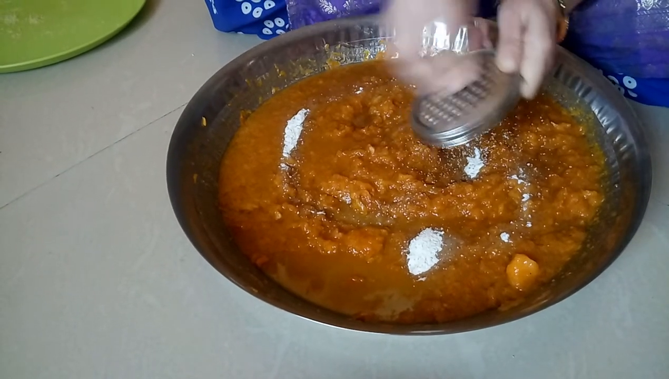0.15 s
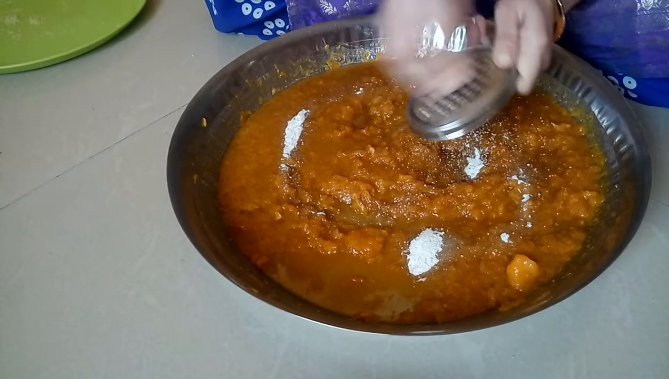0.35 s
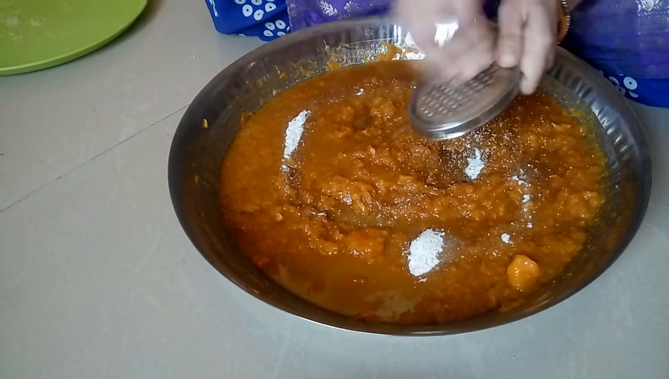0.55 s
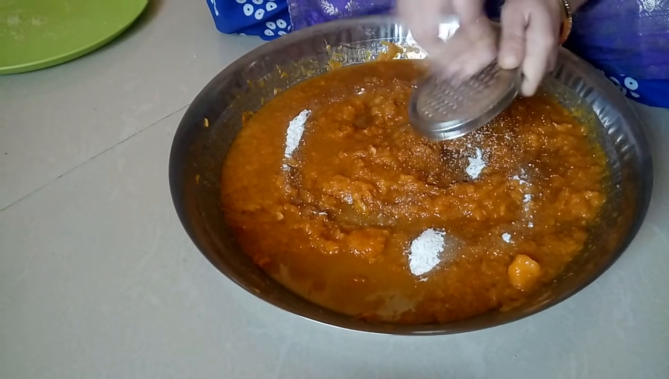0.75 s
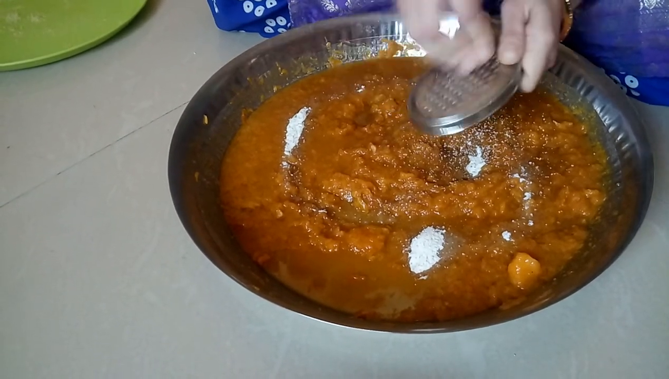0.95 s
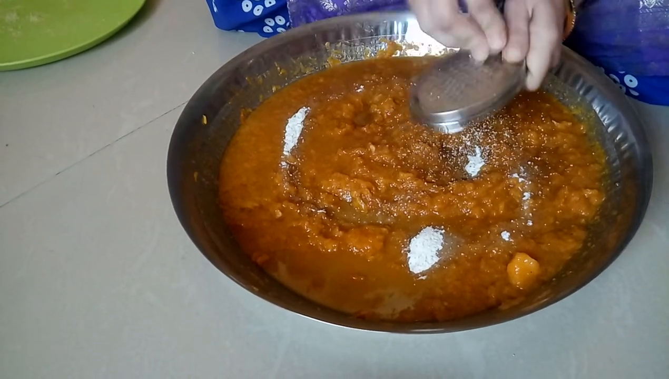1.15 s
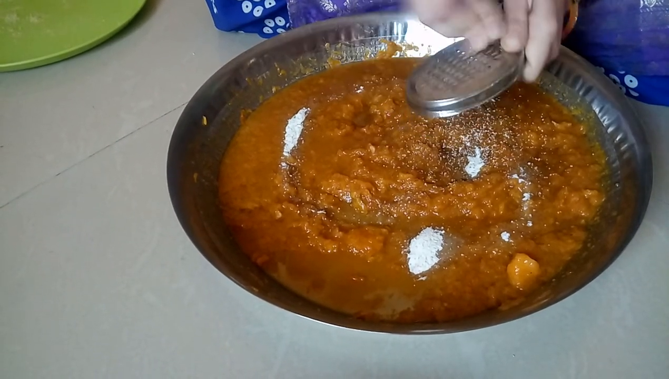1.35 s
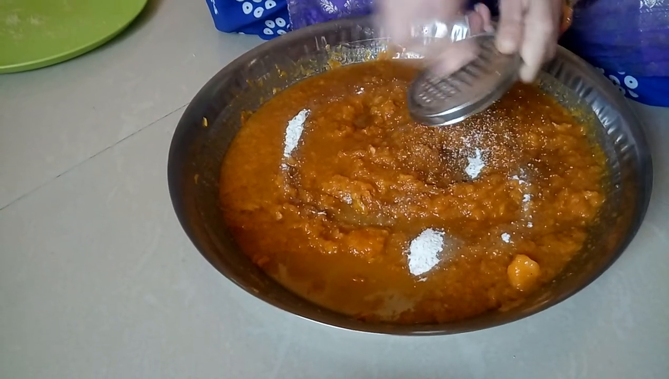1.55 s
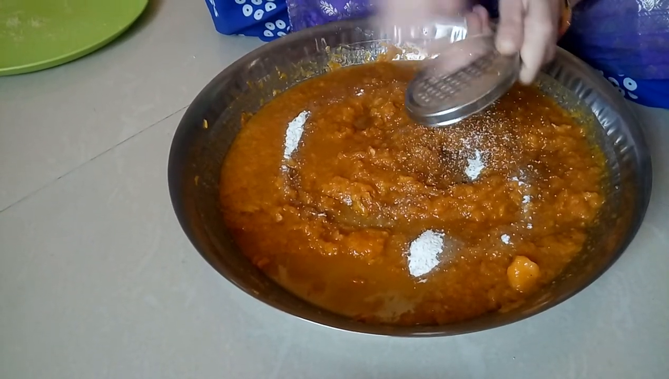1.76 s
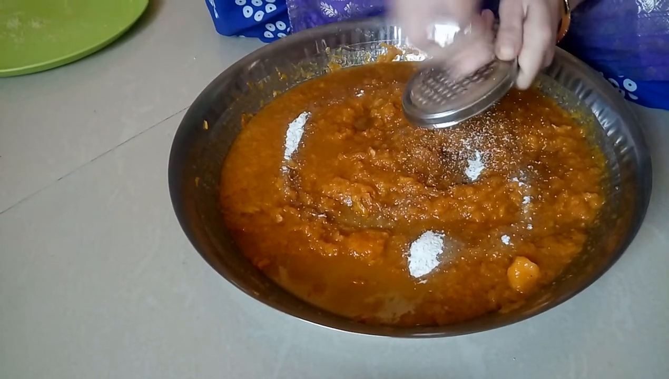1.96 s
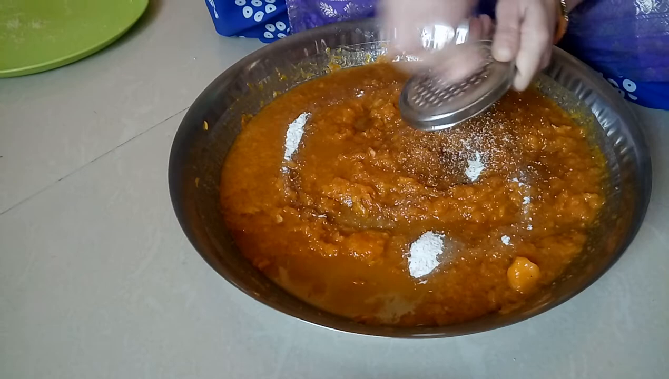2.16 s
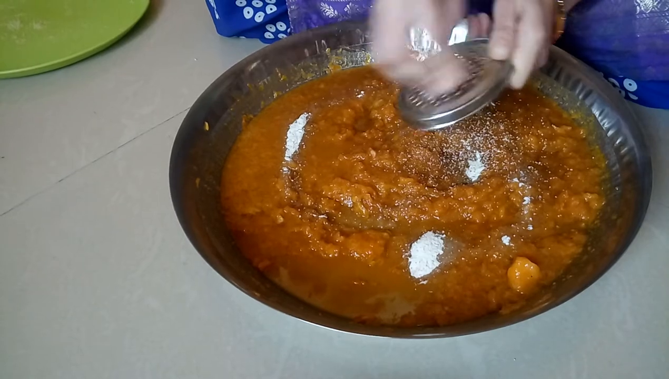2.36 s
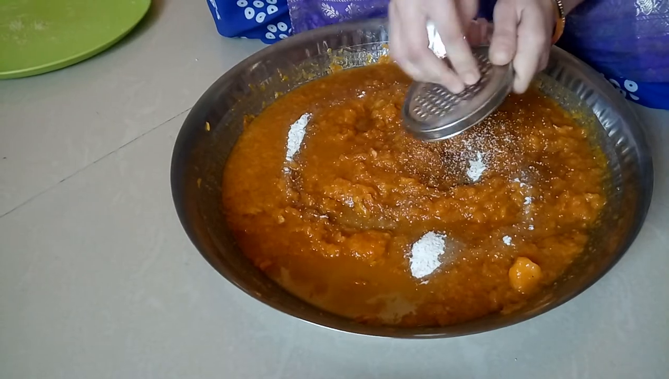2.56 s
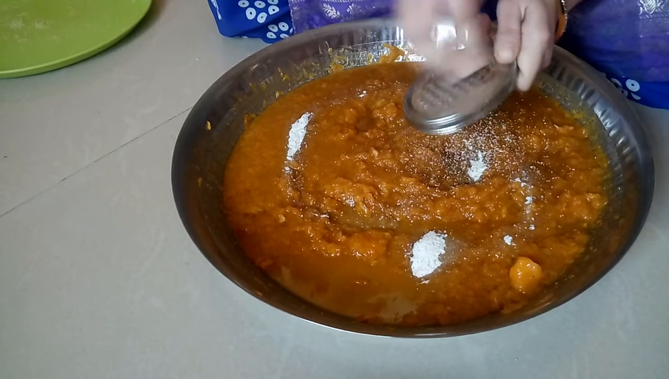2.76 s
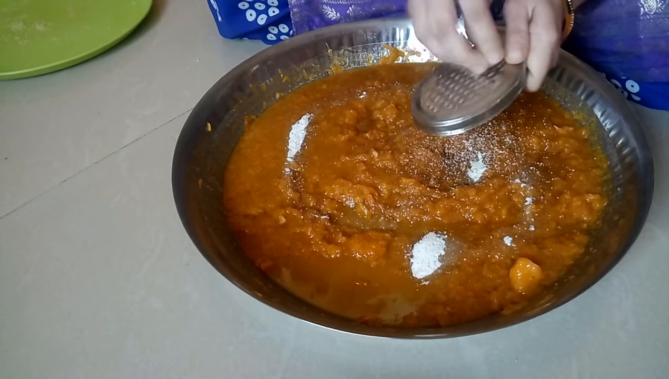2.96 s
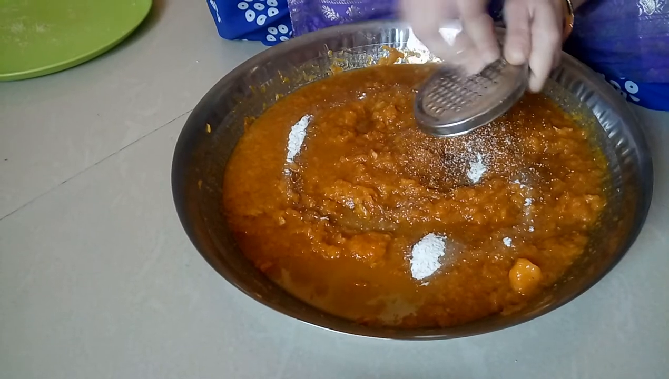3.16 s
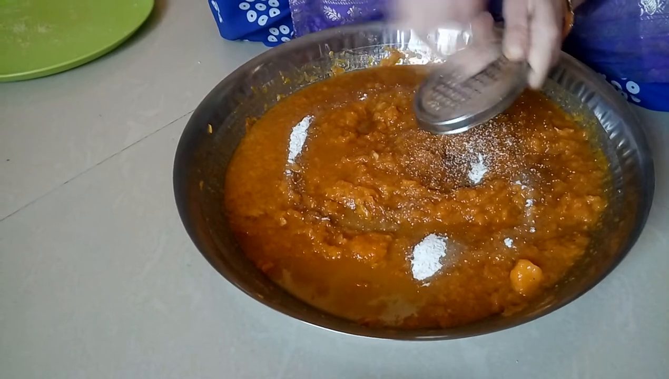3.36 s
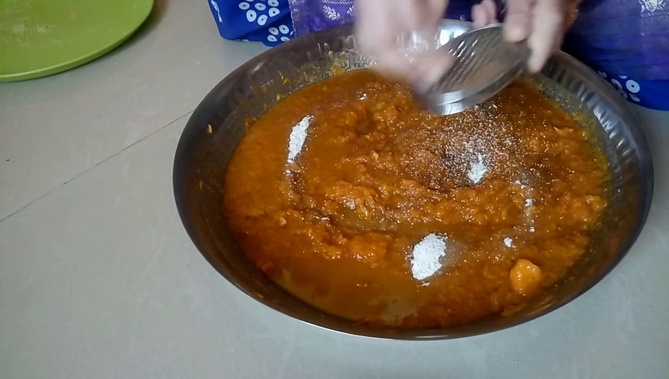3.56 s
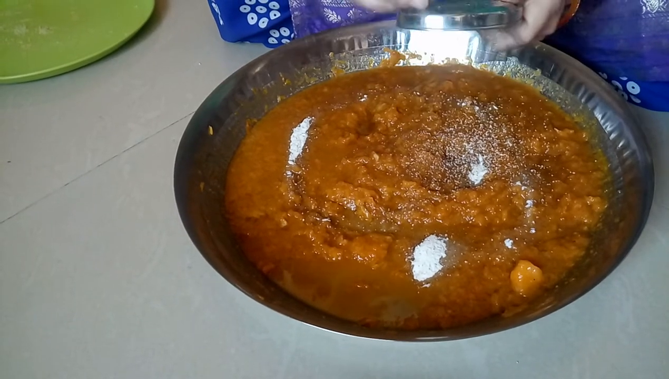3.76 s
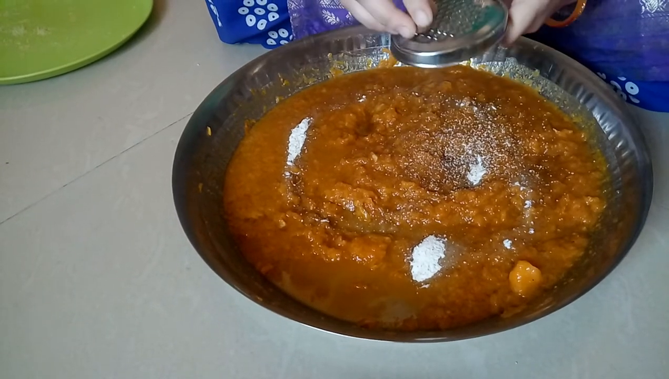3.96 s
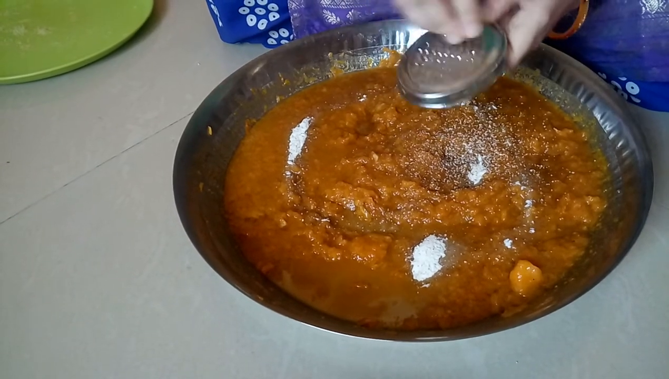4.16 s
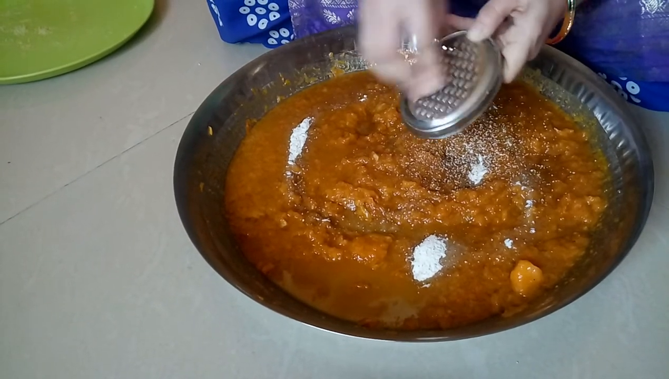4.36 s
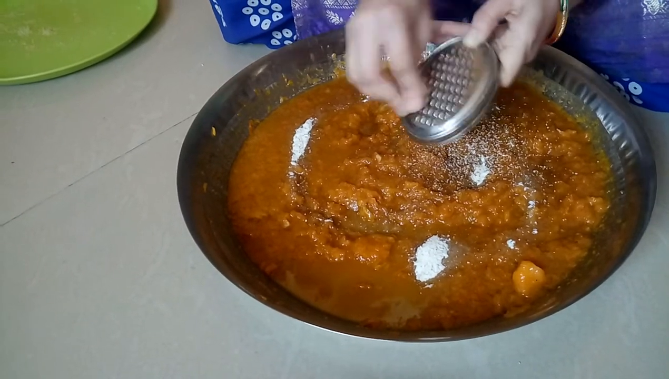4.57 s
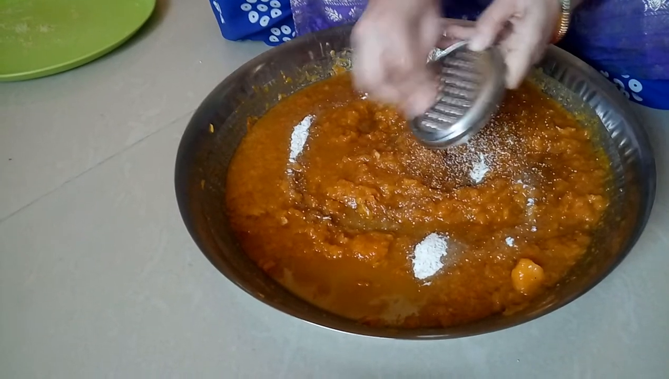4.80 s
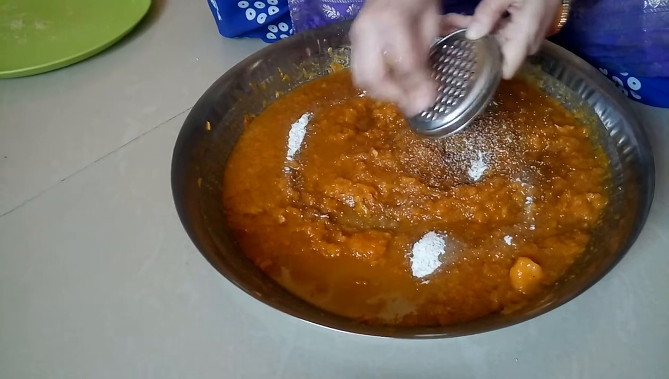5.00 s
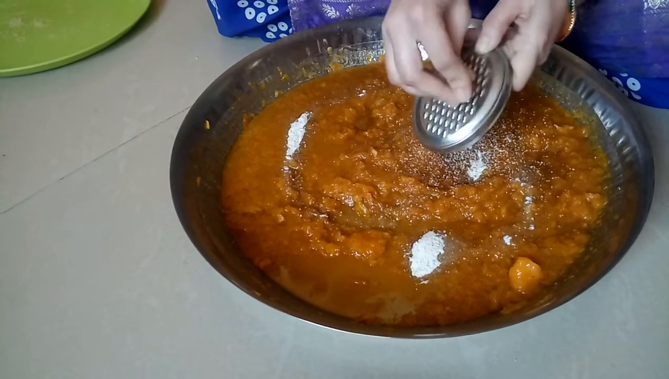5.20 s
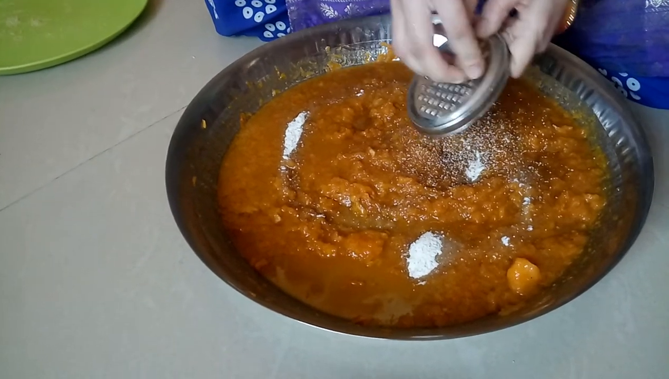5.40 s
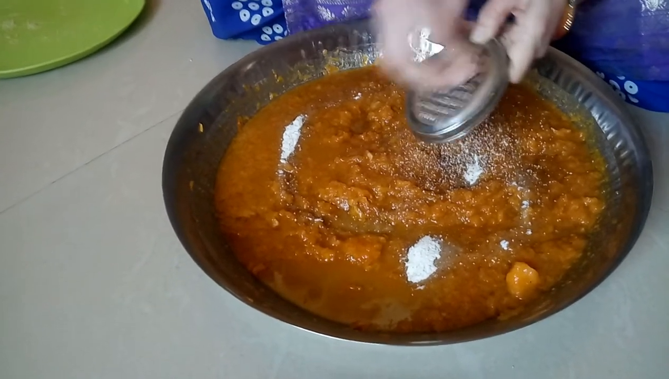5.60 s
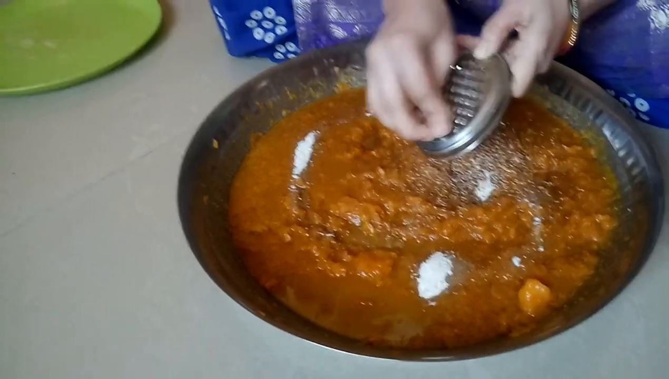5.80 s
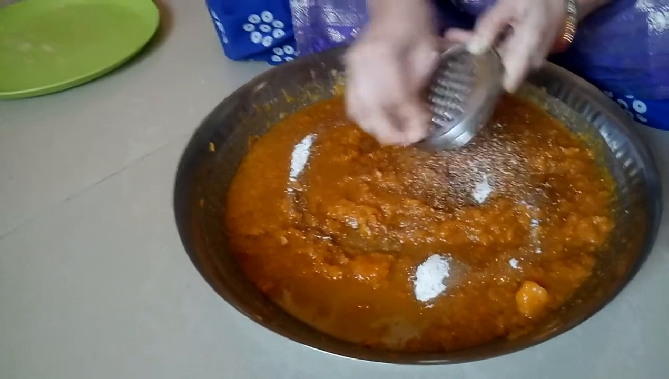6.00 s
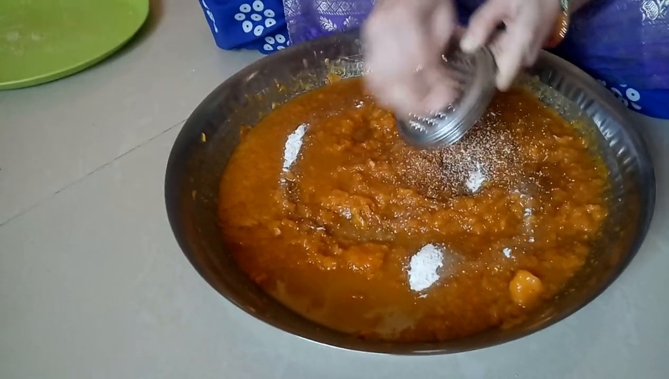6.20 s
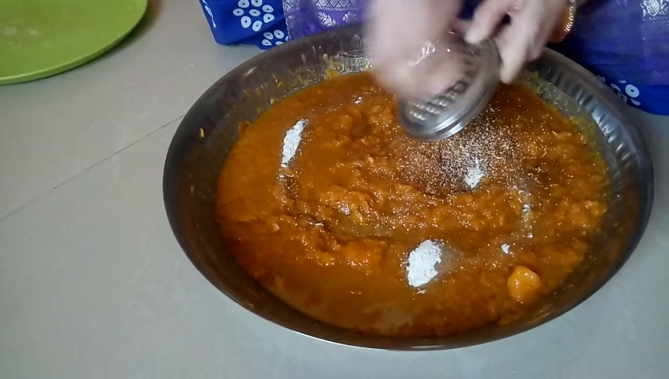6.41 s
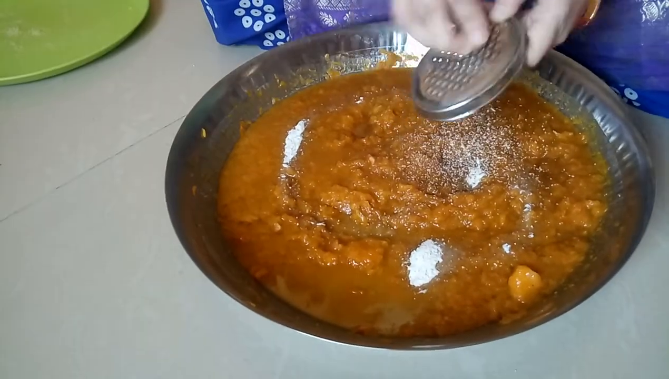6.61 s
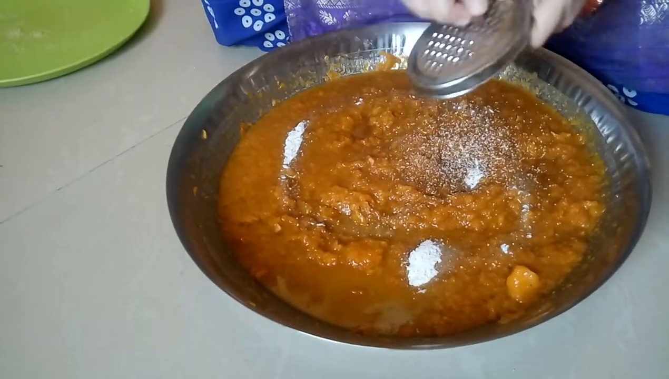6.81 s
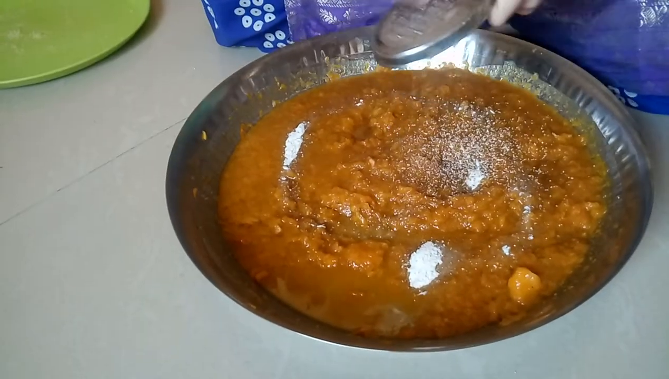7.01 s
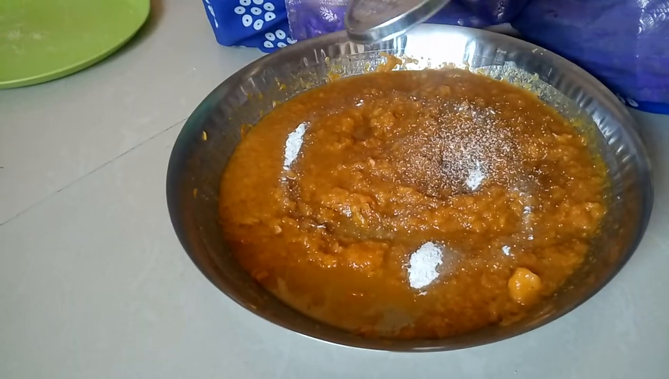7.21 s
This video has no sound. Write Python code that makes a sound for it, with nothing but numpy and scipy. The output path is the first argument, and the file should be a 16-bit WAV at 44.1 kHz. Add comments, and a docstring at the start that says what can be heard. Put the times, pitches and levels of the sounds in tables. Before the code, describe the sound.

Fast, dry, metallic grating strokes of a hard nut on a little steel grater, pausing briefly midway, then resuming more slowly over faint room hush.

```python
"""Nutmeg on a small steel grater

In a kitchen, close to the camera microphone, a nutmeg is rubbed to and fro over a small round grater.
Noisy tooth contacts drive the modes of the held plate; single teeth catch with short ringing scrapes,
and sticking gives brief squawks. Decaying noise makes the room's answer. Hush, rumble and a faint
electric whine lie beneath, and filtered pushes are heard late on as the camera is nudged."""
import sys
import numpy as np
from scipy import signal
from scipy.fft import rfft, irfft, next_fast_len
from scipy.io import wavfile
from scipy.ndimage import uniform_filter1d, map_coordinates

SR = 44100
rng = np.random.default_rng(int(sys.argv[2]) if len(sys.argv) > 2 else 0)


def wav_record(signal):
    """Record a signal, one row per channel, as 16-bit PCM in the file named by sys.argv[1]."""
    frames = np.transpose(np.atleast_2d(signal))
    bounded = np.clip(frames, -1, 1)
    # unit amplitude maps onto the largest positive 16-bit level
    quanta = np.round(bounded * 32767).astype(np.int16)
    wavfile.write(sys.argv[1], SR, quanta)


N = 319725
T = np.arange(N) / SR  # time [s]

# Room and microphone hush: (frequency [Hz], relative density [dB per Hz])
HUSH_SPECTRUM = [(15, -67), (25, -11), (60, -11), (130, -11), (270, -15.5), (800, -14.5), (1800, -23),
                 (3300, -12.5), (4800, -11.5), (6400, -12.5), (8000, -28), (10500, -31), (15500, -48)]
# Thin electric tones: (frequency [Hz], rms level [dB])
WHINE_TONES = [(3456, -70.5), (3515, -79), (4651, -82), (5782, -83), (9243, -90), (9302, -87), (10433, -86),
               (11628, -97), (12758, -92)]
# Steadier sounds under the strokes: (time [s], room rumble [dB], low hum of the rubbed plate [dB])
UNDER_LEVELS = [(0,-70,-51),(.77,-72,-53),(1.41,-66.5,-49.5),(1.7,-71.5,-57.5),(2.36,-68,-68),(2.7,-72,-77),(3.01,-74,-58),(3.35,-74,-55.5),
                (3.74,-68,-65),(4.3,-74.5,-70),(4.97,-73,-50.5),(5.37,-62,-90),(5.57,-73,-66),(5.71,-59.5,-72),(5.96,-58,-59),(6.46,-71.5,-61),(7.25,-73,-67)]
# Strokes of the nut; the cutting stroke bites, the stroke back is duller:
# (start [s], rise [s], fall [s], level [dB], treble bite against that level [dB], favoured main mode [Hz])
NUT_STROKES = [(.007,0.018,0.027,-20.5,-23.5,3330),(.125,0.016,0.023,-20,-39,4100),(.216,0.012,0.037,-20,-23,4960),(0.321,.016,0.026,-22.5,-32,3180),
               (.409,0.019,0.038,-21.5,-23.5,3090),(0.532,0.018,0.029,-21.5,-35,3020),(0.626,0.021,0.029,-21,-25,3100),(0.746,0.013,0.024,-20,-41,4540),
               (.83,0.018,0.035,-19.5,-24.5,3040),(0.939,0.014,0.031,-25.5,-33,4700),(1.037,.019,0.037,-24,-24,4720),(1.146,0.0091,0.048,-24,-38,4500),
               (1.249,0.019,0.041,-21,-26,3280),(1.367,0.014,0.038,-25,-37,4100),(1.467,0.03,0.03,-21.5,-22,4600),(1.587,0.018,0.022,-22,-35,2970),
               (1.674,0.029,0.032,-27.5,-24,3060),(1.792,0.02,0.028,-29,-31,4000),(1.897,0.022,0.032,-22.5,-27,2930),(2.009,0.024,0.031,-29,-30,4350),
               (2.119,0.02,0.039,-21.5,-28,3900),(2.229,0.029,0.03,-31.5,-27,4000),(2.337,0.025,0.037,-23,-27.5,4850),(2.458,0.037,.0087,-29,-35,3960),
               (2.537,0.019,0.032,-35.5,-26,3980),(2.736,.037,0.016,-40.5,-27,4330),(2.817,0.0068,.045,-69,-42,3770),(2.845,0.034,0.035,-23.5,-25.5,2860),
               (2.973,0.024,0.023,-25,-32,3260),(3.077,0.033,0.03,-22.5,-28.5,4300),(3.21,0.013,0.03,-24,-32,4670),(3.307,.025,0.032,-25,-26,4450),
               (3.413,.015,0.033,-24,-39,3050),(3.519,0.025,0.025,-23,-21.5,3200),(3.636,0.0075,0.025,-37.5,-28,4300),(4.162,0.055,0.029,-37,-27,2920),
               (4.317,0.059,0.031,-29.5,-25,3830),(4.448,0.039,0.025,-32,-33,4400),(4.567,0.028,0.026,-25,-26,4100),(4.655,0.037,0.03,-32,-29,4050),
               (4.786,0.023,0.032,-25,-28.5,3440),(4.885,0.046,0.018,-29.5,-34,3900),(4.995,0.03,0.021,-20,-28,3520),(5.088,0.03,0.029,-25,-37,3280),
               (5.174,0.042,.0077,-37,-24,4200),(5.281,0.0037,0.031,-33.5,-36,2860),(5.51,0.042,0.029,-30.5,-24,4420),(5.649,0.041,0.018,-29,-31,4150),
               (5.779,0.035,0.038,-24.5,-25.5,3250),(5.913,0.039,0.019,-30.5,-35,3100),(6.01,0.034,0.034,-27,-28.5,3350),(6.147,0.039,0.018,-32,-28,3000),
               (6.251,0.029,0.034,-25,-26,4020),(6.379,0.034,0.016,-33.5,-26,3940),(6.473,0.029,0.029,-23,-23.5,3060),(6.601,0.029,0.021,-27.5,-28.5,4730),
               (6.698,0.027,0.031,-25.5,-22,4900),(6.827,.0061,0.046,-26,-35,3180),(6.917,0.026,0.029,-25.5,-19.5,3600),(7.039,0.019,0.024,-25.5,-37,4100),
               (7.137,0.013,0.04,-25,-22,4600)]
# Modes of the held plate, in five families from low to high:
# (frequency [Hz], width [Hz], relative level before weighting by width [dB])
HAND_MODES = [(334, 610, -7.5), (546, 1090, -5), (977, 23, 4.5)]
LOW_MODES = [(1396, 170, -40), (1616, 188, -26), (1868, 10, -21), (2246, 142, -16.5), (2526, 180, -14.5)]
MAIN_MODES = [(2859, 140, -4), (3185, 268, 1), (3527, 180, -3), (3929, 240, 2), (4212, 365, 2),
              (4510, 290, 0), (4806, 122, 4), (5058, 434, 2)]
UPPER_MODES = [(5490, 630, -11.5), (5705, 1070, -10.5), (5800, 62, 0), (6305, 420, -7.5), (7200, 83, -14.5),
               (6815, 510, -15), (7530, 220, -20)]
TOP_MODES = [(8680, 300, -70), (9330, 350, -26.5), (11020, 340, -31.5), (11500, 680, -34),
             (13800, 1000, -46.5), (14900, 900, -70)]
# How each family follows a stroke, one row a family:
# (lead-in [s], share at the start [0-1], stretch of the fade [ratio], grip scatter [dB])
FAMILY_FOLLOW = [(0.0084, 0.49, 1.38, 4), (0.03, 0.13, 0.75, 7.5), (0.0087, 0.49, 0.78, 4.5),
                 (0.014, 0.36, 1.64, 4.5), (0.0078, 0.58, 1.02, 7)]
# How the hum follows a stroke: (lead-in [s], share at the start [0-1], stretch of the fade [ratio])
HUM_SWELL = (.02, 0.98, 1.5)
# The shifting grip, for a usual stroke: (time [s], hand modes [dB], low modes [dB])
GRIP_LEVELS = [(0,-57,-46),(.6,-56,-32.5),(1.1,-58,-41),(1.8,-55,-39),(2.15,-50,-33.5),(2.5,-47,-36),(2.8,-57,-35.5),(3.5,-57,-38),
               (4.3,-59.5,-43.5),(5,-60.5,-40.5),(5.3,-43.5,-34),(5.6,-57.5,-44),(6.05,-44.5,-41.5),(6.5,-53,-37.5),(7.25,-60.5,-50)]
# Decay of the room's answer: (frequency [Hz], time to fall 60 dB [s])
KITCHEN_DECAY = [(300, 1), (2600, 0.29), (6000, 0.47), (12000, 0.55)]
# Single catches of a tooth, mostly strong, a few faint:
# (time [s], peak [dB], favoured pitch [Hz], low modes against the rest [dB], rise [ms])
TOOTH_CATCHES = [(0.0147, -17.5, 4480, -16, 1.3), (0.0254, -23, 6270, -16, 1.8),
                 (0.0772, -16, 4700, -12, 0.5), (0.1343, -17, 3980, -13, 1.3),
                 (0.1414, -18, 4050, -10, 1.4), (0.218, -18, 4930, -9, 1.3),
                 (0.2436, -14.5, 4860, -11, 1.2), (0.3276, -18.5, 4800, -12, 1.1),
                 (0.3414, -15.5, 5100, -18, 1.5), (0.418, -18, 5070, -12, 1.7),
                 (0.4424, -15.5, 4700, -17, 1.5), (0.545, -12, 3200, -10, 1.3),
                 (0.5526, -16.5, 4800, -12, 1.3), (0.6275, -12.5, 5140, -15, 1.7),
                 (0.6494, -11, 4420, -13, 1.6), (0.7515, -11, 4430, -15, 1), (0.7597, -9, 4600, -22, 1.1),
                 (0.8404, -8.5, 4980, -21, 1), (0.8474, -7, 5000, -14, 1.7), (0.947, -14, 4280, -24, 1.1),
                 (0.9604, -18, 4740, -12, 1.1), (0.966, -21, 3980, -9, 1.3),
                 (1.0333, -19.5, 5800, -17, 1.3), (1.0455, -15.5, 4950, -9, 1.6),
                 (1.0578, -16, 3230, -17, 2.1), (1.0666, -15, 4750, -4, 1.3), (1.0814, -18, 6140, -13, 1.3),
                 (1.1641, -13, 4700, -12.5, 1.14), (1.173, -14, 4670, -17, 0.93),
                 (1.191, -16, 3830, -16, 1.3), (1.2625, -11.5, 5100, -12, 1.5),
                 (1.2754, -10.5, 4600, -13, 1.4), (1.314, -18.5, 3060, -8, 1.2),
                 (1.3878, -11, 4400, -15, 1), (1.4088, -14.5, 4680, -16, 1.2),
                 (1.4636, -18, 4840, -11, 1.5), (1.4902, -15, 4600, -10, 1.6),
                 (1.5956, -17.5, 3980, -17, 1.5), (1.6083, -14, 4060, -12, 1.5),
                 (1.7046, -14, 4830, -17, 1.3), (1.7898, -19.5, 4350, -14, 1.8),
                 (1.8225, -17, 3900, -12, 1.2), (1.8347, -17, 3930, -15, 1.5), (1.877, -33, 4900, -5, 1.3),
                 (1.8974, -17.5, 4200, -9, 2.3), (1.9454, -20, 4860, -16, 1.6),
                 (2.0376, -17, 4320, -14.5, 1.4), (2.0502, -16, 4570, -19, 1.5),
                 (2.1301, -16, 3880, 0, 1.3), (2.143, -9, 4450, -9, 0.98), (2.1561, -7.5, 4580, -14, 0.55),
                 (2.2523, -18, 4160, -17, 1.3), (2.2657, -19, 3880, -14, 1.3),
                 (2.3338, -20, 4830, -11, 1.1), (2.3501, -19, 4700, -11, 1.3),
                 (2.3635, -16, 4640, -12, 0.98), (2.3768, -13, 4660, -10, 0.91),
                 (2.4672, -15, 3900, -16, 1.5), (2.4872, -12, 3900, -21, 1.7),
                 (2.5486, -24, 4700, -11, 1.3), (2.5696, -21, 4710, -12, 0.99),
                 (2.7327, -30.5, 4600, -20, 1.3), (2.8465, -15, 4600, -10.5, 2.1),
                 (2.8788, -14, 4920, -9.5, 0.84), (3.0064, -18, 4960, -12, 1.5),
                 (3.083, -20, 4000, -18, 1.6), (3.1274, -16.5, 4930, -21, 1.5),
                 (3.2117, -14, 4350, -18, 2.1), (3.2294, -12.5, 4760, -13.5, 1.6),
                 (3.3184, -21, 4760, -14, 2), (3.3296, -15, 4370, -24, 1.9), (3.4298, -19, 4900, -11, 1.5),
                 (3.528, -17, 4900, -12, 1.3), (3.5314, -14, 4980, -13, 1.3), (3.5497, -14, 4380, -15, 1.6),
                 (3.985, -43.5, 4840, -17, 1.6), (4.157, -34.5, 4900, -25, 1.5),
                 (4.2027, -24, 4890, -9, 1.8), (4.2125, -24, 4830, -9.5, 1.8), (4.374, -24, 3950, -20, 2.3),
                 (4.454, -21.5, 4760, -19, 1.4), (4.4947, -23, 4730, -7, 1), (4.566, -24.5, 4630, -27, 1.6),
                 (4.59, -13, 4740, -24, 1.3), (4.5998, -15, 4680, -16, 1.6), (4.6858, -23, 4840, -14, 0.69),
                 (4.7983, -21.5, 4870, -10, 1.3), (4.9296, -16.5, 3860, -12.5, 1.4),
                 (5.0067, -17, 4680, -10.5, 1.4), (5.0206, -23, 4220, -15, 1.4),
                 (5.031, -15.5, 4320, -22, 0.82), (5.1264, -20, 5000, -14, 2.1),
                 (5.2015, -21.5, 4140, -15, 1.5), (5.2862, -29, 3820, -16, 1.3),
                 (5.2954, -20.5, 3920, -14, 1.2), (5.5114, -26.5, 5000, -23, 1.9),
                 (5.5557, -18, 4880, -26, 1.4), (5.6747, -22.5, 4160, -15, 1.5),
                 (5.7773, -16, 4220, -16.5, 1.8), (5.8064, -15, 4420, -12, 1.3),
                 (5.9247, -20.5, 3300, -10, 1.3), (5.9387, -19.5, 4000, -23, 1.3),
                 (6.043, -15, 3380, -11.5, 1.2), (6.168, -19, 3530, -17, 1.4),
                 (6.2637, -16, 4950, -15, 1.3), (6.2764, -18, 4640, -16, 0.95),
                 (6.402, -19, 3930, -24, 1.3), (6.4928, -17.5, 4560, -14, 1.4),
                 (6.5194, -22, 4830, -2, 1.3), (6.623, -14, 4700, -12, 0.91), (6.7307, -14, 4950, -37, 1.6),
                 (6.838, -13, 4040, -17.5, 1.1), (6.9344, -12.5, 4260, -19, 2.1),
                 (6.9436, -21, 5000, -15, 1), (7.0408, -19.5, 4700, -18, 1.3),
                 (7.0708, -13, 4750, -16, 0.97), (7.1442, -12, 4600, -18, 1.3),
                 (7.1634, -18, 4760, -20, 1.8), (7.173, -18, 4500, -17, 1.1)]
# Squawks of the lowest plate modes, where the nut sticks: (time [s], peak [dB], frequency [Hz])
STICKING_SQUAWKS = [(0.1176, -39, 1355), (0.2475, -39, 1376), (0.514, -46, 1330), (0.615, -31, 1614),
                    (0.82, -39, 1610), (0.8733, -34, 1403), (1.147, -42, 1480), (1.3638, -42, 1540),
                    (1.463, -41, 1650), (1.5778, -45, 1580), (1.8781, -41.5, 1570), (2.1423, -36, 1700),
                    (2.822, -48, 1600), (3.196, -42.5, 1565), (3.348, -47, 1590), (3.5009, -53, 1670),
                    (3.6481, -44, 1483), (4.9294, -36.5, 1627), (5.0888, -48, 1490), (5.2844, -43, 1550),
                    (5.6394, -50, 1530), (6.023, -42, 1630)]
# Pushes at the camera, before housing and mount respond: (time [s], peak [dB], width at half height [ms])
CAMERA_NUDGES = [(5.662, -38, 1.04), (5.808, -42, 1.1), (5.816, -42, 2.3), (5.834, -32, 1.1),
                 (5.845, -27, 0.92), (5.8515, -29, 1), (5.8541, -24.5, 0.57), (5.8683, -32, 1.7),
                 (5.873, -26, 0.5), (5.8756, -23.5, 0.57), (5.8877, -28, 0.46), (5.8914, -23, 0.65),
                 (5.9137, -22.5, 0.49), (5.9199, -27.5, 0.67), (5.923, -30, .8), (6.0224, -15.5, 0.38),
                 (6.0276, -30, 1.4), (6.033, -42, 3), (6.0455, -36, 1.3), (6.0692, -36, 0.57),
                 (6.119, -35, 1.3)]

USUAL_DB, USUAL_BITE_DB = -26, -30  # level and bite of a usual stroke
HAND_FOLLOWS, LOW_FOLLOWS, UPPER_FOLLOWS = 0.97, 0.76, 1  # dB of a family for each dB of stroke level
UPPER_DB, UPPER_BITES = -33, 0.32  # upper modes in a usual stroke; dB for each dB of bite
LOW_FAVOURED_HZ = 2257
HUM_SCATTER_DB = 4.5
# smaller catches come as the nut crosses the rows of teeth
ROW_S, ROW_SCATTER = 0.012, 0.3  # time from row to row; its scatter, in rows
SMALL_DB, SMALL_SCATTER_DB = -2, 2  # against the level of the stroke
SMALL_HZ, SMALL_HZ_SCATTER = 4650, 0.11  # median pitch; log scatter
SMALL_MS, SMALL_MS_SCATTER = 1.14, 0.87  # median rise; log scatter
SMALL_LOW_DB = -16  # low modes against the rest
RING_DB, RING_T60_S = -27.5, 0.36  # what is left ringing after a catch
LOW_RING = 0.36  # extra share of the low modes in that ring
PRESSED_HZ_SCATTER = 0.012  # how far the fingers shift the modes, as a fraction
SQUAWK_MS = 3  # rise time
TOP_HZ = 15600  # band limit of the camera


def amp(db):
    """dB to gain."""
    return 10 ** (np.asarray(db) / 20)


def unit(x):
    """Scale to rms 1."""
    return x / np.sqrt(np.mean(x ** 2) + 1e-20)


def along(points, hz):
    """Interpolate (frequency [Hz], value) points on a log frequency axis."""
    f, value = np.transpose(points)
    return np.interp(np.log(hz + 1), np.log(f + 1), value)


def filtered(x, response):
    """Multiply the spectrum of x by a response of frequency."""
    m = next_fast_len(N + 8192)
    hz = np.fft.rfftfreq(m, 1 / SR)
    return irfft(rfft(x, m) * response(hz), m)[..., :N]


def wobble(rate):
    """A smooth random curve, rate knots a second, without rare tall peaks."""
    knots = rng.standard_normal(int(N * rate / SR) + 4)
    return 2 * np.tanh(map_coordinates(knots, [T * rate]) / 2)


def ring(force, hz, width_hz):
    """A damped mode with steep flanks (a resonance applied twice); white noise of rms 1 keeps rms 1."""
    r = np.exp(-np.pi * np.sqrt(2) * width_hz / SR)
    w = 2 * np.pi * hz / SR
    section = [1, 0, -1, 1, -2 * r * np.cos(w), r * r]
    energy = np.linalg.norm(signal.sosfilt([section] * 2, signal.unit_impulse(2048)))
    return signal.sosfilt([section] * 2, force) / energy


def swells(lead_s, start, stretch):
    """Each stroke creeps in, swells as the nut speeds up and fades as it slows: (first sample, shape)."""
    for s, rise, fall in np.array(NUT_STROKES)[:, :3]:
        first = max(0, round((s - 0.05) * SR))
        t = T[first:round((s + rise + 4 * fall) * SR)] - s
        creeping = start * np.exp(np.minimum(t, 0) / lead_s)
        swelling = start + (1 - start) * t / rise
        growing = np.where(t < 0, creeping, swelling)
        fading = np.exp(-((t - rise) / (stretch * fall)) ** 2)
        yield first, np.where(t < rise, growing, fading)


def background():
    """Shaped noise gives a slightly uneven hush; sines with drifting phase give a thin electric whine."""
    noise = rng.standard_normal(N)
    hush = unit(filtered(noise, lambda hz: amp(along(HUSH_SPECTRUM, hz))))
    tones = np.zeros(N)
    for hz, db in WHINE_TONES:
        drift = np.cumsum(rng.standard_normal(N)) * 0.00059
        tones += amp(db + 3.0) * np.sin(2 * np.pi * (hz * T + drift))  # +3 dB: rms to peak
    return amp(-63.0 + 2.7 * wobble(39)) * hush + tones


def under():
    """A lumpy rumble of the room, and the lowest plate modes humming while the nut stays on."""
    s, rumble_db, hum_db = np.transpose(UNDER_LEVELS)
    rumble = ring(amp(6.0 * wobble(5)) * rng.standard_normal(N), 103, 130)
    rubbing = np.zeros(N)
    for first, shape in swells(*HUM_SWELL):
        rubbing[first:first + len(shape)] += shape
    hum = np.zeros(N)
    for hz, width, _ in LOW_MODES[:2]:
        push = rubbing * amp(HUM_SCATTER_DB * wobble(30)) * rng.standard_normal(N)
        hum += ring(push, hz, width)
    rumble_gain = amp(np.interp(T, s, rumble_db))
    hum_gain = amp(np.interp(T, s, hum_db))
    return rumble_gain * unit(rumble) + hum_gain * unit(hum)


def family_levels():
    """dB of the five mode families in each stroke, from its level, its bite and the grip."""
    s, _, _, level, bite, _ = np.transpose(NUT_STROKES)
    t, hand_db, low_db = np.transpose(GRIP_LEVELS)
    over = level - USUAL_DB
    hand = np.interp(s, t, hand_db) + HAND_FOLLOWS * over
    low = np.interp(s, t, low_db) + LOW_FOLLOWS * over
    upper = UPPER_DB + UPPER_FOLLOWS * over + UPPER_BITES * (bite - USUAL_BITE_DB)
    return hand, low, level, upper, level + bite


def rasp(rate=1100, spread_db=1.5, grit_db=-6.5, contact_s=0.0005, favour_db=6, focus=0.045):
    """Many small uneven tooth contacts drive the plate; where the nut passes decides which modes speak."""
    hits = rng.random(N) < rate / SR  # contacts a second
    size = hits * amp(spread_db * np.minimum(rng.exponential(size=N), 3.5))
    size = unit(uniform_filter1d(size, max(1, round(contact_s * SR))))
    contacts = np.hypot(size, amp(grit_db))  # fine grit fills the gaps between contacts
    main_hz = np.array(NUT_STROKES)[:, -1]
    families = (HAND_MODES, LOW_MODES, MAIN_MODES, UPPER_MODES, TOP_MODES)
    out = np.zeros(N)
    for level, family, (*timing, grip_db) in zip(family_levels(), families, FAMILY_FOLLOW):
        shapes = list(swells(*timing))
        hz, width, db = np.transpose(family)
        # closeness of each mode (rows) to the favoured pitches of each stroke (columns)
        near = 0
        for best in (LOW_FAVOURED_HZ, main_hz):
            near = near + np.exp(-(np.log(hz[:, None] / best) / focus) ** 2)
        share = (amp(db) * np.sqrt(width))[:, None] * amp(favour_db * near)
        gains = share / np.linalg.norm(share, axis=0) * amp(level)
        for mode_hz, mode_width, stroke_gains in zip(hz, width, gains):
            push = np.zeros(N)
            for (first, shape), gain in zip(shapes, stroke_gains):
                push[first:first + len(shape)] += gain * shape
            grip = unit(amp(grip_db * wobble(35)))
            out += ring(push * contacts * grip * rng.standard_normal(N), mode_hz, mode_width)
    return out


def kitchen(x, size=SR // 5):
    """The room's answer dies at its own speed in each band; a fresh noise tail is drawn every fifth of a second."""
    out = np.zeros(N + 2 * SR)
    for first in range(0, N, size):
        hz, t, z = signal.stft(rng.standard_normal(SR * 3 // 4), SR, nperseg=256)
        decay = amp(-60 * t / along(KITCHEN_DECAY, hz)[:, None])
        tail = signal.istft(z * decay, SR, nperseg=256)[1]
        answer = signal.fftconvolve(x[first:first + size], tail / np.linalg.norm(tail))
        out[first + 200:][:len(answer)] += answer  # 200 samples, about 4.5 ms, behind the direct sound
    return out[:N]


def small_catches(count=5):
    """One small catch at each row of teeth, weaker once the stroke has peaked: rows as in TOOTH_CATCHES."""
    s, rise, fall, level = np.repeat(np.array(NUT_STROKES)[:, :4], count, axis=0).T
    jitter, size, pitch, length = rng.standard_normal((len(s), 4)).T
    row = np.arange(len(s)) % count
    t = ROW_S * (row + 0.5 + ROW_SCATTER * jitter)
    fade_db = -8 * (np.maximum(t - rise, 0) / fall) ** 2
    peak_db = level + SMALL_DB + fade_db + SMALL_SCATTER_DB * size
    hz = SMALL_HZ * np.exp(SMALL_HZ_SCATTER * pitch)
    ms = SMALL_MS * np.exp(SMALL_MS_SCATTER * length)
    return np.transpose([np.abs(s + t), peak_db, hz, np.full(len(s), SMALL_LOW_DB), ms])


def catches(focus=0.049, floor=0.23):
    """A tooth digs in and lets go: a brief scrape that rings mostly the modes near its pitch."""
    hz, width, db = np.transpose(LOW_MODES + MAIN_MODES + UPPER_MODES)
    low = np.arange(len(hz)) < len(LOW_MODES)
    out = np.zeros(N + SR)
    t = np.arange(SR // 8) / SR
    after = amp(RING_DB - 60 * t / RING_T60_S) * (1 - np.exp(-t / 0.006))
    for s, peak_db, pitch, low_db, ms in [*TOOTH_CATCHES, *small_catches()]:
        level_chance, phase_chance, hz_chance = rng.standard_normal((3, len(hz)))
        near = np.exp(-(np.log(hz / pitch) / focus) ** 2)
        g = amp(1.47 * db + 5.3 * level_chance) * (floor + near)
        low_g = amp(low_db) * g / np.linalg.norm(g[low])
        g = np.where(low, low_g, g / np.linalg.norm(g[~low]))
        pressed_hz = hz * (1 + PRESSED_HZ_SCATTER * hz_chance)
        modes = np.sin(2 * np.pi * (pressed_hz[:, None] * t + phase_chance[:, None]))
        u = t * 1000 / ms
        sound = (g @ modes) * u * np.exp(1 - u)  # the nut stays pressed on and damps the ring
        sound += (g ** 2 + LOW_RING * low * g) @ modes * after  # the strongest and the low modes last a little
        out[round(s * SR):][:len(t)] += amp(peak_db) * sound / np.abs(sound).max()
    return out[:N]


def squawks():
    """Where the nut sticks, one low mode sounds as a brief soft-edged sine."""
    out = np.zeros(N + SR)
    t = np.arange(SR // 20) / SR
    u = t * 1000 / SQUAWK_MS
    for s, db, hz in STICKING_SQUAWKS:
        out[round(s * SR):][:len(t)] += amp(db) * u * np.exp(1 - u) * np.sin(2 * np.pi * hz * t)
    return out[:N]


def nudges():
    """Each nudge is one short push; the housing swings back, and hard pushes rock the mount."""
    push, rock = np.zeros((2, N))
    for s, db, ms in CAMERA_NUDGES:
        pulse = np.exp(-((T - s) * 1000 / (0.6 * ms)) ** 2)
        push += amp(db) * pulse
        rock += amp(2 * db + 23) * pulse  # grows with the square of the push

    def housing(hz):  # high-pass at 125 Hz
        return (1j * hz) ** 2 / ((1j * hz) ** 2 + 1j * hz * 110 + 125 ** 2)

    def mount(hz):  # inverted resonance at 72 Hz, 30 Hz wide
        return -1j * hz * 30 / (72 ** 2 - hz * hz + 1j * hz * 30)

    return filtered(push, housing) + filtered(rock, mount)


def scene():
    """Grater close by with the kitchen's answer, over rumble, hum, nudges and background."""
    grater = amp(-4.0) * rasp() + catches() + squawks()
    answer = amp(-8.5) * kitchen(grater)
    return (grater + answer + under() + nudges() + background())[None]


def record(dry):
    """The microphone drops the deepest bass; the camera keeps nothing above its band limit."""
    def microphone(hz):  # high-pass at 42 Hz
        bass_cut = (1j * hz) ** 2 / ((1j * hz) ** 2 + 1j * hz * 55 + 42 ** 2)
        return bass_cut * (hz < TOP_HZ)

    return filtered(dry, microphone)


dry = scene()
out = record(dry)
wav_record(out)
```